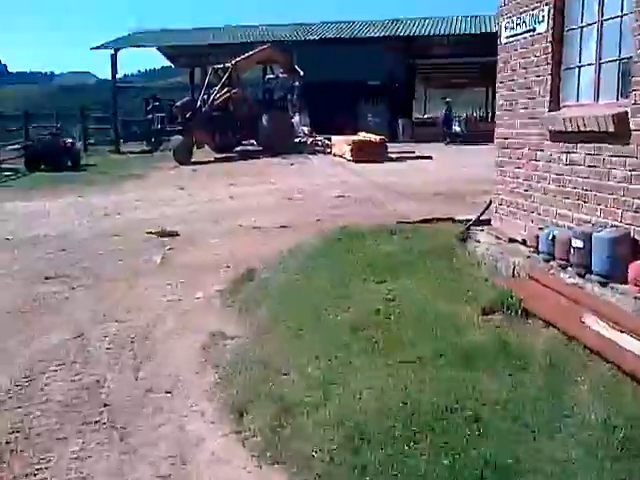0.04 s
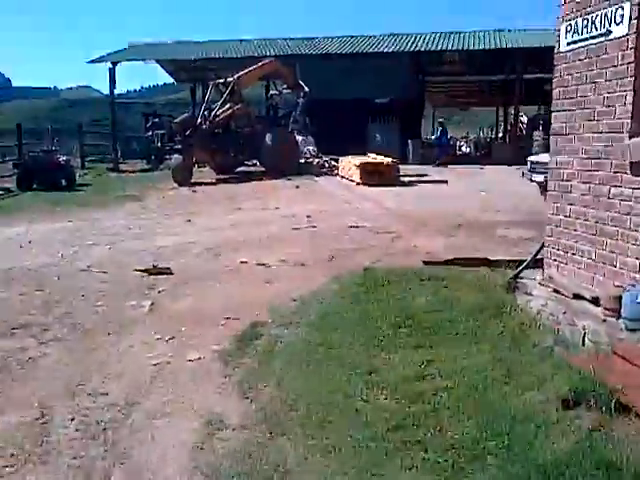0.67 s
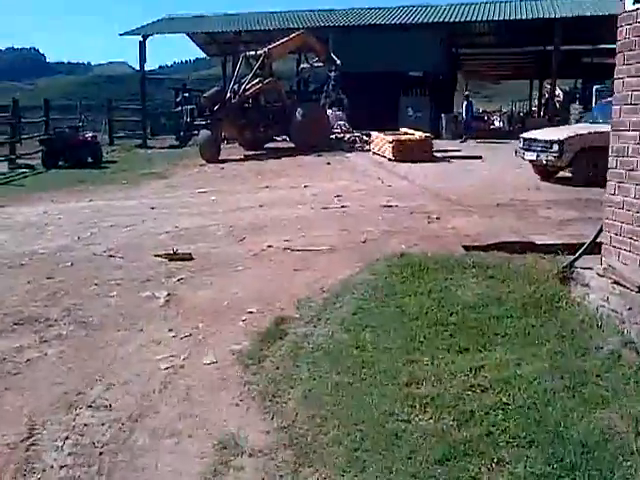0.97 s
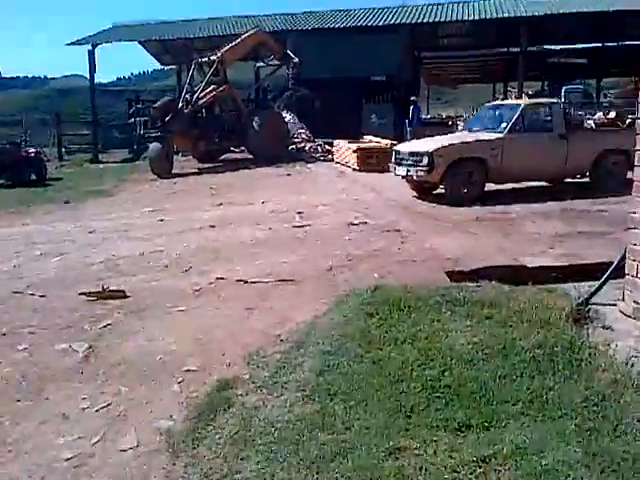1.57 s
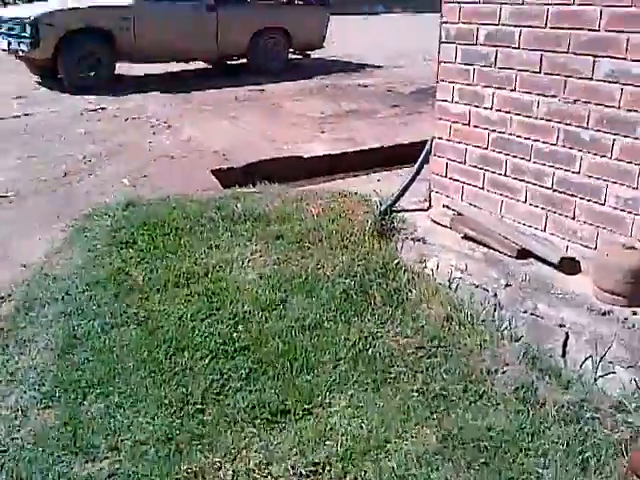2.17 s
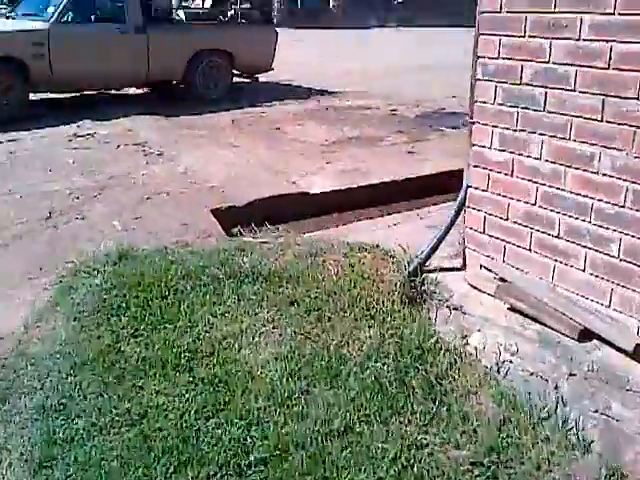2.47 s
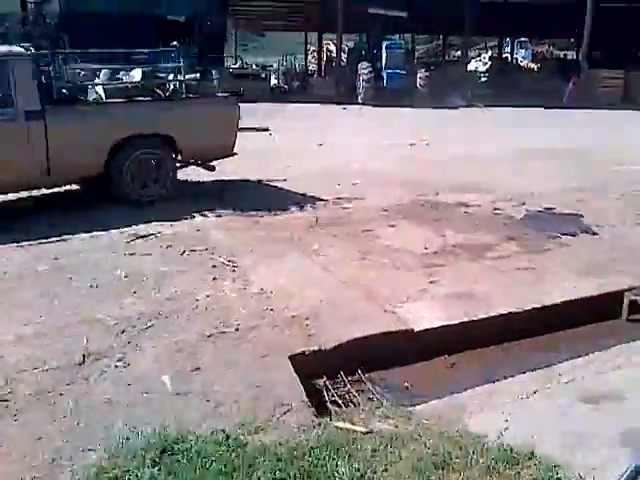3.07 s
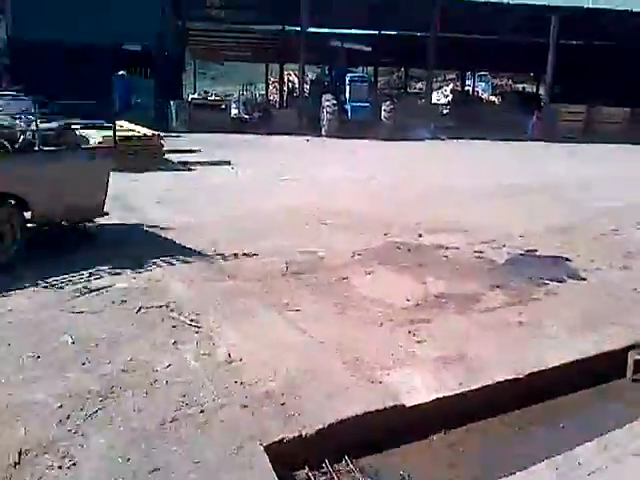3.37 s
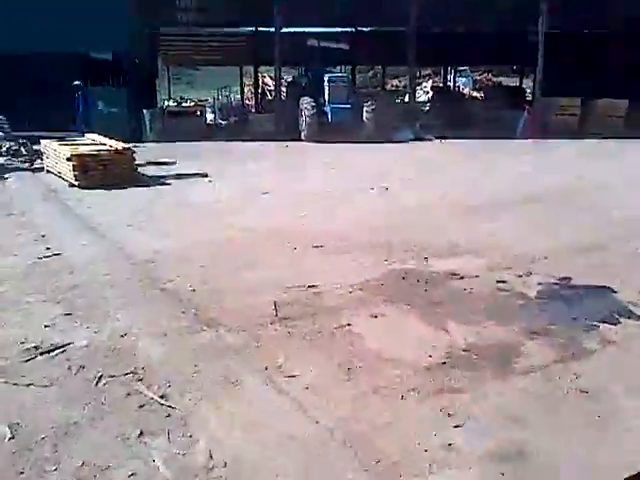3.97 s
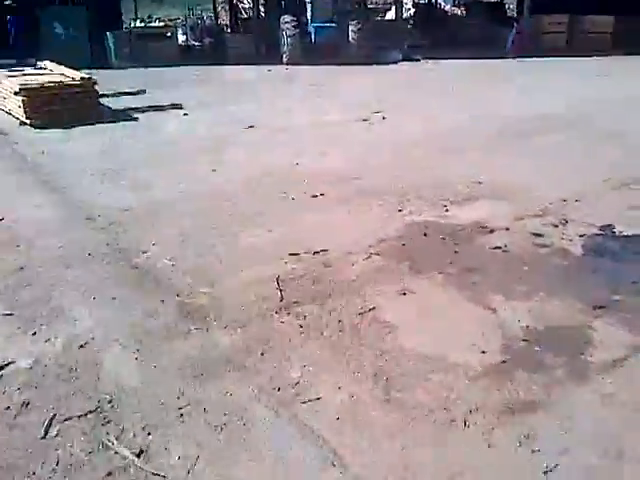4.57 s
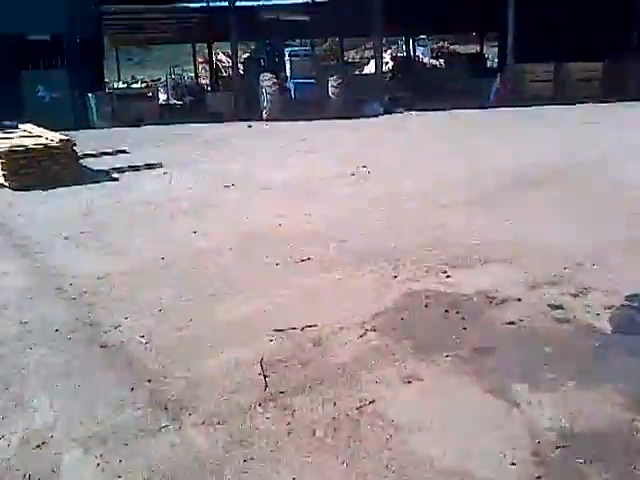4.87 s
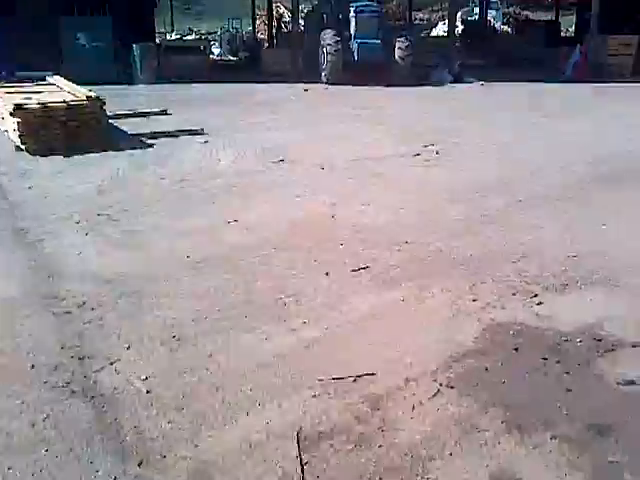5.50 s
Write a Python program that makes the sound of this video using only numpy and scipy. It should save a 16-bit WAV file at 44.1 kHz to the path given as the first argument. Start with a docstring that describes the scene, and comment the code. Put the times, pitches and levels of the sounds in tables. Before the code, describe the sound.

A band saw whines and hisses through a log over a throbbing diesel engine, while wooden planks clack now and then.

```python
"""Band sawmill across a yard

An electric band saw cuts under an open shed, heard while walking past a brick building. It whines at
harmonics of its tooth rate and hisses through the log; a six-cylinder diesel throbs and knocks, and a
motor hums. Wall echoes interfere, so tones swell and fade; they brighten as the shed comes into view.
Sawn planks clack now and then; the loudest overload the recorder and push its gain down for a moment."""
import sys
import numpy as np
from scipy import signal
from scipy.fft import rfft, irfft, next_fast_len
from scipy.io import wavfile

SR = 44100
rng = np.random.default_rng(int(sys.argv[2]) if len(sys.argv) > 2 else 0)


def to_wav(sig):
    """Store sig (one row per channel, or 1-D mono) as 16-bit WAV at the path in sys.argv[1].

    Samples outside -1..1 are clipped; the rate is SR.
    """
    pcm = np.clip(np.atleast_2d(sig), -1, 1) * 32767
    pcm = np.round(pcm).astype(np.int16)
    wavfile.write(sys.argv[1], SR, pcm.T)  # frames by channels


N = 253134
TIME = np.arange(N) / SR


# Envelopes of the whine's harmonics; the sixth screeches, the seventh surges and breaks off.
# Each row: time in seconds, level in dB.
HARMONIC_1 = [(0, -18), (.05, -25), (.2, -34), (.5, -26), (.62, -32), (.85, -22.5), (1.02, -34.5),
              (1.11, -17), (1.2, -20), (1.36, -31), (1.6, -21.5), (1.9, -18), (2.3, -25), (2.9, -22.5),
              (2.97, -39), (3.04, -21), (3.32, -19.5), (3.5, -23), (3.7, -24.5), (3.9, -23), (4.2, -35),
              (4.36, -21.5), (4.55, -37.5), (4.75, -18.5), (5.1, -29), (5.32, -19.5), (5.55, -32),
              (5.74, -19.5)]
HARMONIC_2 = [(0, -31), (1, -28.5), (1.2, -26.5), (2.4, -29.5), (2.95, -25), (3.55, -22), (3.8, -35),
              (3.97, -18), (4.28, -20), (4.45, -24), (4.85, -23.5), (4.95, -20), (5.3, -26), (5.49, -28),
              (5.62, -18), (5.74, -35)]
HARMONIC_4 = [(0, -35.5), (1.8, -34.5), (2.28, -24), (2.55, -28), (2.8, -43.5), (3.45, -32.5), (3.55, -27),
              (3.7, -31), (3.85, -25), (4.12, -24.5), (4.6, -28), (4.88, -31), (5.1, -25), (5.74, -43)]
HARMONIC_5 = [(0, -46), (2.4, -31.5), (3, -29.5), (3.55, -22.5), (3.8, -40), (3.94, -24.5), (4.35, -29),
              (4.7, -23), (4.84, -43), (4.92, -26), (5.42, -27.5), (5.52, -28.5), (5.74, -23.5)]
HARMONIC_6 = [(0, -33), (2.7, -36.5), (3.1, -21), (3.24, -35), (3.39, -20), (3.55, -22), (3.78, -29),
              (3.95, -22.5), (4.01, -38), (4.1, -27), (4.5, -32), (4.59, -21), (4.85, -30), (5.1, -21.5),
              (5.25, -19), (5.32, -25), (5.54, -36), (5.68, -24.5), (5.74, -26)]
HARMONIC_7 = [(0, -57), (.42, -43), (.6, -60), (.76, -44), (.84, -32), (.96, -38), (1.12, -50), (1.9, -34),
              (2.35, -43.5), (2.55, -30), (2.75, -37.5), (3.12, -26.5), (3.22, -31), (3.34, -27),
              (3.46, -35), (3.72, -42), (3.86, -26.5), (3.97, -22), (4.19, -29.5), (4.215, -48),
              (4.255, -40), (4.28, -28), (4.42, -27), (4.52, -26), (4.55, -40), (4.6, -35), (4.63, -28),
              (4.8, -23), (4.85, -39), (4.87, -46), (4.89, -23), (4.95, -24), (4.99, -30), (5.06, -32),
              (5.38, -41), (5.45, -25.5), (5.55, -39), (5.74, -44)]
HARMONIC_8 = [(0, -53), (2.6, -48), (3.25, -47.5), (3.38, -38), (3.48, -51), (3.85, -52), (4, -33),
              (4.22, -53), (4.4, -41.5), (4.66, -38.5), (4.9, -46), (5.2, -42), (5.4, -47.5), (5.55, -39.5),
              (5.74, -38)]
HARMONIC_9 = [(0, -52), (3.3, -58), (3.7, -49), (3.9, -51.5), (4.18, -42), (4.45, -55.5), (5.74, -58)]

def whine(teeth, in_open, fading_db, fading_hz, flutter_db):
    """Periodic excitation: harmonics of the tooth rate, each swelling and fading as echoes interfere."""
    def overtone(multiple, db):
        """One harmonic with slight phase jitter."""
        return from_db(db) * tone(multiple * teeth + 0.018 * drift(45))
    fundamental = from_db(in_time(HARMONIC_1)[0] + 0.5 * drift(15)) * tone(teeth)
    envelopes = {2: HARMONIC_2, 4: HARMONIC_4, 5: HARMONIC_5, 6: HARMONIC_6,
                 7: HARMONIC_7, 8: HARMONIC_8, 9: HARMONIC_9}
    upper = sum(overtone(k, in_time(rows)[0] + flutter_db * drift(45)) for k, rows in envelopes.items())
    third_db = shaded_db(in_open, behind_db=-35, open_db=-32) + fading_db * drift(fading_hz)
    return fundamental + upper + overtone(3, third_db)


# Envelope of the cutting hiss. Each row: time in seconds, level in dB.
HISS_LEVEL = [(0, -16.5), (.45, -16), (.75, -20), (1.3, -16.5), (2.75, -18.5), (3.02, -14), (3.25, -18),
              (3.5, -19.5), (3.75, -19.5), (4.65, -16), (5.74, -17)]
# Its spectrum. Each row: frequency in Hz, relative level in dB.
HISS_SPECTRUM = [(800, 6.5), (2000, 1.5), (2700, -3.5), (3200, 4.5), (3800, 5), (4200, 0), (4600, -7.5),
                 (5000, -11), (5700, -18.5), (6300, -25), (7000, -39.5)]

def cutting(teeth, bite):
    """Amplitude modulation: the noise of tearing fibres pulses per tooth and flickers with the grain."""
    tearing = rng.standard_normal(N) * (1 + bite * tone(teeth))
    grain = from_db(0.8 * drift(50))
    return from_db(in_time(HISS_LEVEL)[0]) * colour(tearing * grain, HISS_SPECTRUM)


# A resonance of the blade. Each row: time in seconds, centre frequency in Hz, level in dB.
RASP_RESONANCE = [(0, 1900, -36), (.45, 1950, -26), (.62, 1800, -25.5), (.88, 1940, -23.5),
                  (1.1, 1800, -26), (1.5, 1760, -24), (1.75, 1760, -30.5), (3, 1700, -31.5), (4, 1700, -44),
                  (5.74, 1700, -40)]

def rasp(teeth, bite, spread_hz):
    """Narrow-band noise: the teeth scrape a blade resonance, which shifts as the cut moves on."""
    hz, level_db = in_time(RASP_RESONANCE)
    phase = 2 * np.pi * np.cumsum(hz) / SR
    band = drift(spread_hz) * np.cos(phase) + drift(spread_hz) * np.sin(phase)
    return from_db(level_db) * rms_one(band * (1 + bite * tone(teeth)))


# The two swells of the singing blade. Each row: time of the peak in seconds, peak level in dB.
BLADE_SWELLS = [(.84, -21.5), (2.17, -21)]

def blade_song(modes_hz, rise_db_per_s, fall_db_per_s):
    """Friction-driven vibration: the wood rubs one bending mode of the band into song, then another."""
    out = 0
    for (peak_s, peak_db), hz in zip(BLADE_SWELLS, modes_hz):
        below_db = np.maximum(rise_db_per_s * (peak_s - TIME), fall_db_per_s * (TIME - peak_s))
        swell = from_db(peak_db - below_db + 0.48 * drift(15))
        out = out + swell * tone(hz * TIME + 0.019 * drift(7.5))
    return out


# Planks landing. Each row: start in seconds, ring level in dB, crack level in dB,
# ring frequency in Hz, tilt of the crack in dB per octave.
LANDINGS = [(.361, -21, -19, 2070, 9), (.862, -18.5, -21, 2090, -1), (1.573, -3.5, -7.5, 2230, -9),
            (1.649, -12, -9, 2870, 6), (1.679, -10.5, -18, 4150, 0), (1.693, -13, -8, 2780, 0),
            (2.116, -32, -15, 2470, -1), (2.251, -16, -11.5, 2680, -3), (2.531, -39, -14.5, 2480, 2),
            (2.953, -29, -12.5, 2300, -7), (3.092, -14, -10, 2560, 0), (3.613, -12.5, -6.5, 2124, 0),
            (4.144, -12.5, -9, 2090, -5), (4.617, -22, -19, 2270, 6), (4.760, -7.5, -9, 2165, 2),
            (4.786, -12, -22, 2240, -1), (5.388, -13.5, -17, 2110, 6)]
# Modes of a plank. Each row: multiple of the ring frequency, relative level in dB.
WOOD_MODES = [(0.995, -4), (1.261, -13.5), (1.39, -12.5)]
# Spectrum of the crack before tilting. Each row: frequency in Hz, relative level in dB.
CRACK_SPECTRUM = [(900, -19.5), (1900, -3), (2700, -5), (3400, 3.5), (4000, 2), (4600, -9), (5500, -23),
                  (7000, -34.5)]

def planks(smear_hz, ring_t60_s, crack_t60_s, attack_s, top_mode_hz):
    """Impact excitation: each plank gives a broadband crack and damped modes, smeared by the shed."""
    noise, out = rng.standard_normal(N), np.zeros(N)
    smear = [0.16 * drift(smear_hz) for _ in WOOD_MODES]   # phase jitter, in turns
    for start_s, ring_db, crack_db, hz, tilt_db in LANDINGS:
        first = int(start_s * SR)
        span = slice(first, first + SR // 2)
        age = TIME[span] - TIME[first]
        modes = sum(from_db(db) * tone(hz * ratio * age + jitter[span])
                    for (ratio, db), jitter in zip(WOOD_MODES, smear) if hz * ratio < top_mode_hz)
        ring = modes * from_db(ring_db - 60 * age / ring_t60_s)
        tilted = [(band, db + tilt_db * np.log2(band)) for band, db in CRACK_SPECTRUM]
        crack = colour(noise[span], tilted) * from_db(crack_db - 60 * age / crack_t60_s)
        out[span] += (1 - np.exp(-age / attack_s)) * (ring + crack)
    return out


# The six cylinders in firing order. Each entry: relative strength in dB.
CYLINDER_STRENGTHS = [0.5, -10, 4.5, -7, 6, -4]

def firings(cycles, scatter_db):
    """Impulse train: one pulse per firing; unequal cylinders make the pattern recur once per cycle."""
    number = np.floor(cycles * len(CYLINDER_STRENGTHS)).astype(int)
    onsets = np.flatnonzero(np.diff(number)) + 1
    strength_db = np.take(CYLINDER_STRENGTHS, number[onsets], mode="wrap")
    pulses = np.zeros(N)
    pulses[onsets] = from_db(strength_db + scatter_db * rng.standard_normal(len(onsets)))
    return pulses


# Envelope of the exhaust along the walk. Each row: time in seconds, gain in dB.
EXHAUST_GAIN = [(0, -19), (.75, -20), (1.35, -18.5), (1.6, -22.5), (2.5, -22.5), (2.8, -27), (3.5, -23),
                (4.6, -21), (5.45, -22), (5.74, -23.5)]
# Spectrum of its pulses. Each row: frequency in Hz, relative level in dB.
EXHAUST_SPECTRUM = [(60, -47), (130, -17), (200, -1), (320, 9), (460, -1.5), (570, -6.5), (700, -27.5),
                    (1000, -5), (2000, -24)]
# Its strong tones. Each row: order (multiple of the cycle rate, rounded when played),
# relative level behind the building in dB, relative level in the open in dB.
EXHAUST_ORDERS = [(9, -13, -11), (10, -16.5, -14.5), (11, -13.5, -14), (12, -22.5, -24), (13, -21, -22.5),
                  (14, -16.5, -10.5), (15, -8.5, -9), (16, -19.5, -7.5), (23, -5.5, -20.5), (25, -14.5, -8),
                  (26, -6, -14.5), (30, -10, -8.5), (47, -44, 2.5), (90.1, -17, -11.5), (94.2, -14, -11)]

def exhaust(cycles, in_open, waver_db):
    """Source and filter: coloured firing pulses and their echoes, with strong orders as pure tones."""
    pulses = firings(cycles, scatter_db=1.5)
    chug = from_db(-8) * colour(pulses, EXHAUST_SPECTRUM)
    echoes = from_db(-20) * colour(shed(pulses, t60_s=0.068, direct_db=-4.5), EXHAUST_SPECTRUM)
    tones = 0
    for order, behind_db, open_db in EXHAUST_ORDERS:
        level_db = shaded_db(in_open, behind_db, open_db) + waver_db * drift(5.3)
        tones = tones + from_db(level_db) * tone(round(order) * cycles)
    return from_db(in_time(EXHAUST_GAIN)[0]) * (chug + echoes + from_db(-3.5) * tones)


# Boom at order 18, the third harmonic of the firing rate. Each row: time in seconds, level in dB.
LOW_BOOM = [(0, -42), (.18, -26), (.3, -31), (.42, -27), (.78, -25), (1.15, -19), (1.36, -20.5), (1.6, -55),
            (2.2, -34.5), (2.48, -25), (2.62, -24), (2.78, -44), (3.03, -24), (3.35, -38.5), (4.15, -34),
            (4.53, -22.5), (4.85, -42), (5.2, -32), (5.4, -44), (5.74, -43)]
# Higher booms. Each row: time in seconds, then the levels of orders 33, 36 and 54 in dB.
UPPER_BOOMS = [(0, -25, -27.5, -47), (.4, -31, -21.5, -31), (.8, -31, -32, -28.5), (1.45, -35, -22, -26),
               (2.1, -46, -30, -37), (2.55, -36.5, -28, -26.5), (3.1, -31, -25.5, -41),
               (3.75, -26, -27, -49), (3.88, -20, -24.5, -46), (4.1, -40, -44, -37),
               (5.74, -41.5, -30.5, -36)]

def booms(cycles):
    """Engine orders: four exhaust harmonics, locked to the cycle, swell and fade separately."""
    out = from_db(in_time(LOW_BOOM)[0]) * tone(18 * cycles)
    for order, db in zip((33, 36, 54), in_time(UPPER_BOOMS)):
        out += from_db(db + 0.55 * drift(4.3)) * tone(order * cycles)
    return out


# The exhaust's deep hum. Each row: multiple of the cycle rate, level in dB.
HUM_ORDERS = [(3, -54), (5, -51), (6, -34.5), (7, -47.5), (8, -45.5)]

def deep_hum(cycles):
    """Diffraction: the lowest orders bend round every wall, so their level stays nearly steady."""
    return sum(from_db(db + 0.64 * drift(0.93)) * tone(order * cycles) for order, db in HUM_ORDERS)


# Envelope of the engine's clatter. Each row: time in seconds, gain in dB.
CLATTER_GAIN = [(0, -1), (.9, -1.5), (1.5, -1), (2.1, -3), (2.9, -1), (3.3, -2.5), (3.8, -4), (4.3, -0.5),
                (5.1, 0.5), (5.74, 0)]
# Its spectra behind the building and in the open. Each row: frequency in Hz, relative level in dB.
SHADED_SPECTRUM = [(150, -39.5), (400, -3), (560, 4), (740, -3), (900, -10), (1100, -10.5), (1400, -0.5),
                   (1550, -0.5), (1750, 3.5), (2000, 2), (2300, -3), (2800, -18), (4500, -14.5)]
OPEN_SPECTRUM = [(150, -8), (400, -13), (600, 6.5), (800, -1), (930, -3.5), (1080, 4), (1300, 4), (1550, 2),
                 (1750, -1.5), (2000, -8), (2300, -3), (2800, 2), (4500, -48)]

def clatter(cycles, in_open, level_db, rattle_s):
    """Structure-borne noise: each firing knocks the block and sets off a short, decaying rattle."""
    pulses = firings(cycles, scatter_db=0.4)
    rattle = smooth(pulses, rattle_s) * rng.standard_normal(N)
    knocks = rms_one(pulses) + from_db(21) * rms_one(rattle)
    echoing = shed(knocks, t60_s=0.56, direct_db=-7)
    behind = np.sqrt(1 - in_open) * colour(echoing, SHADED_SPECTRUM)
    in_view = np.sqrt(in_open) * colour(echoing, OPEN_SPECTRUM)
    return from_db(level_db + in_time(CLATTER_GAIN)[0]) * (behind + in_view)


# Envelope of the silencer's thump. Each row: time in seconds, level in dB.
SILENCER_LEVEL = [(0, -19.5), (.7, -29), (1.4, -29), (1.7, -38), (2.9, -38.5), (3.7, -31), (4.2, -28),
                  (5.1, -26.5), (5.74, -29.5)]

def thump(cycles, in_open, scatter_db):
    """Resonance: once per engine cycle, a low thump rings the silencer and a knock rings the block."""
    pulses = np.diff(np.floor(cycles), prepend=0) * from_db(scatter_db * drift(25))
    silencer = from_db(in_time(SILENCER_LEVEL)[0]) * resonate(pulses, hz=315, stage_t60_s=0.034)
    block_db = shaded_db(in_open, behind_db=-35, open_db=-22.5)
    block = from_db(block_db) * resonate(pulses, hz=1056, stage_t60_s=0.008)
    return silencer + block


# Envelope of the motor's hum, heard once the shed is in view. Each row: time in seconds, level in dB.
MOTOR_HUM_LEVEL = [(0, -55), (3.9, -47.5), (4.3, -22), (4.42, -31.5), (4.68, -21), (4.88, -43),
                   (5.05, -20.5), (5.25, -39), (5.42, -25), (5.74, -47)]

def motor(hz, waver_db):
    """Forced vibration: an electric motor hums at a constant pitch and a wavering level."""
    return from_db(in_time(MOTOR_HUM_LEVEL)[0] + waver_db * drift(11)) * tone(hz * TIME)


# Background of the yard. Each row: frequency in Hz, relative level in dB.
YARD_SPECTRUM = [(12, -25), (25, -19.5), (50, -20.5), (80, -21.5), (130, -4), (250, 1), (600, 2.5),
                 (1500, -0.5), (6000, -52)]

def yard(level_db):
    """Stationary noise: a steady, dull wash lies under the machines."""
    return from_db(level_db) * colour(rng.standard_normal(N), YARD_SPECTRUM)


def shed(x, t60_s, direct_db, positions=4):
    """Reverberation: roof and walls scatter echoes whose pattern changes along the walk; rms 1."""
    delay, out = TIME[:SR // 3], 0
    walk = np.linspace(0, positions - 1, N)
    for position in range(positions):
        response = rng.standard_normal(len(delay)) * from_db(-60 * delay / t60_s)
        response /= np.linalg.norm(response)
        response[0] += from_db(direct_db)
        crossfade = np.cos(np.pi / 2 * np.clip(walk - position, -1, 1))
        out = out + crossfade * irfft(rfft(x) * rfft(response, N), N)
    return rms_one(out)


def shaded_db(in_open, behind_db, open_db):
    """Acoustic shadow: a level moves between its values behind the building and in the open."""
    return behind_db + (open_db - behind_db) * in_open


def resonate(pulses, hz, stage_t60_s):
    """Damped resonance: pulses ring two identical resonators in series; rms 1."""
    radius, angle = from_db(-60 / (stage_t60_s * SR)), 2 * np.pi * hz / SR
    poles = [1, -2 * radius * np.cos(angle), radius ** 2]
    once = signal.lfilter([1, 0, -1], poles, pulses + 1e-18)
    return rms_one(signal.lfilter([1, 0, -1], poles, once + 1e-18))


def colour(x, points):
    """Spectral shaping by (Hz, dB) points, falling 53 dB per octave beyond the ends; rms 1."""
    hz, db = np.transpose(points)
    bins = np.arange(len(x) // 2 + 1) * SR / len(x) + 1e-3
    octaves_beyond = np.abs(np.log2(bins / np.clip(bins, hz[0], hz[-1])))
    gain = from_db(np.interp(np.log(bins), np.log(hz), db) - 53 * octaves_beyond)
    return rms_one(irfft(rfft(x) * gain, len(x)))


def drift(rate_hz):
    """Random modulation: noise of rms 1, low-passed near rate_hz and drawn at every 20th sample."""
    size = next_fast_len(N // 20 + 2, True)
    hz = np.arange(size // 2 + 1) * SR / 20 / size
    slow = irfft(rfft(rng.standard_normal(size)) / (1 + (hz / rate_hz) ** 2) ** 2, size)
    return np.interp(np.arange(N) / 20, np.arange(size), rms_one(slow))


def tone(turns):
    """A sinusoid of rms 1 that follows a count of turns from a random phase."""
    return np.sqrt(2) * np.sin(2 * np.pi * (turns + rng.random()))


def smooth(x, seconds):
    """Exponential averaging by a one-pole lag."""
    keep = np.exp(-1 / (seconds * SR))
    return signal.lfilter([1 - keep], [1, -keep], x)


def in_time(rows):
    """Linear interpolation of each column after the time, at every sample."""
    seconds, *columns = np.transpose(rows)
    return [np.interp(TIME, seconds, column) for column in columns]


def from_db(db):
    """Decibels to amplitude ratio."""
    return 10 ** (np.asarray(db) / 20)


def rms_one(x):
    """Normalisation to unit rms."""
    return x / np.sqrt(np.mean(x ** 2) + 1e-20)


# The saw's almost steady speed. Each row: time in seconds, teeth per second.
TOOTH_RATE = [(0, 656.4), (.75, 656.1), (1.45, 657.4), (2.4, 656.2), (3, 654.8), (4.1, 655.2), (4.8, 654.8),
              (5.74, 653.1)]
# The diesel sags under load and recovers. Each row: time in seconds, firings per second.
FIRING_RATE = [(0, 95.7), (.75, 94.6), (1.1, 94.7), (1.5, 93.5), (1.9, 94.0), (2.5, 93.8), (3, 94.8),
               (3.45, 94.9), (3.85, 96.0), (4.3, 95.5), (5.74, 95.5)]
# View of the shed. Each row: time in seconds, share from 0 (behind the building) to 1 (in the open).
SHED_VIEW = [(0, 0.01), (1.5, 0.16), (2.2, 0.39), (3.5, 0.32), (3.9, 0.35), (4.25, 0.87), (5.74, 0.91)]

def scene():
    """Superposition: saw, planks, engine and yard add in one channel."""
    in_open = in_time(SHED_VIEW)[0]
    firing_hz = in_time(FIRING_RATE)[0] * (1 + 0.001 * drift(8))
    tooth_hz = in_time(TOOTH_RATE)[0] * (1 + 0.0004 * drift(8))
    cycles = np.cumsum(firing_hz) / SR / len(CYLINDER_STRENGTHS)
    teeth = np.cumsum(tooth_hz) / SR
    engine = exhaust(cycles, in_open, waver_db=2) + booms(cycles) + deep_hum(cycles)
    engine += clatter(cycles, in_open, level_db=-16.5, rattle_s=0.0082)
    saw = cutting(teeth, bite=0.076)
    saw += whine(teeth, in_open, fading_db=6, fading_hz=15, flutter_db=2)
    saw += rasp(teeth, bite=0.31, spread_hz=480)
    saw += blade_song(modes_hz=(1911, 2451), rise_db_per_s=27, fall_db_per_s=39)
    saw += motor(hz=411, waver_db=2.5)
    wood = planks(smear_hz=70, ring_t60_s=0.24, crack_t60_s=0.12, attack_s=0.00077, top_mode_hz=4700)
    background = yard(level_db=-28.5)
    engine += thump(cycles, in_open, scatter_db=2.5)
    return (saw + wood + engine + background)[None]


def gain_control(x, threshold_db, window_s, attack_s, release_db_per_s):
    """Automatic gain control: the gain drops quickly when the level passes a threshold and creeps back."""
    level_db = 10 * np.log10(smooth(x ** 2, window_s) + 1e-12)
    excess_db = np.maximum(level_db - threshold_db, 0)
    release_db = release_db_per_s * TIME
    held_db = np.maximum.accumulate(excess_db + release_db, axis=-1) - release_db
    return x * from_db(-smooth(held_db, attack_s))


def record(dry):
    """Saturation and band limiting: peaks round off dully; any still past full scale clip with a tick."""
    overload, distortion_top_hz, band_top_hz, tick_top_hz = 0.92, 5000, 7000, 15800
    held = gain_control(dry, threshold_db=-10, window_s=0.0078, attack_s=0.0033, release_db_per_s=5)
    distortion = held / (1 + (held / overload) ** 8) ** (1 / 8) - held
    distortion_filter = signal.butter(4, distortion_top_hz, fs=SR, output="sos")
    rounded = held + signal.sosfiltfilt(distortion_filter, distortion)
    dull = signal.sosfilt(signal.ellip(10, 0.3, 80, band_top_hz, fs=SR, output="sos"), rounded)
    clipped = np.clip(dull, -1, 1)
    return signal.sosfilt(signal.ellip(10, 0.1, 80, tick_top_hz, fs=SR, output="sos"), clipped)


dry = scene()
out = record(dry)
to_wav(out)
```